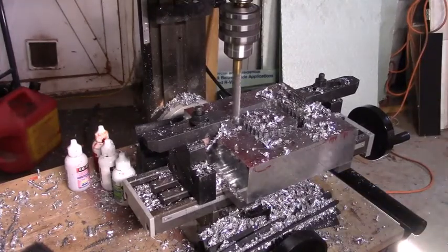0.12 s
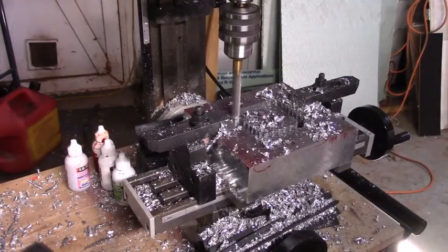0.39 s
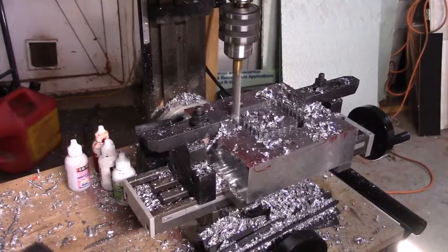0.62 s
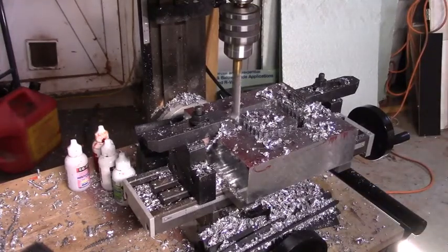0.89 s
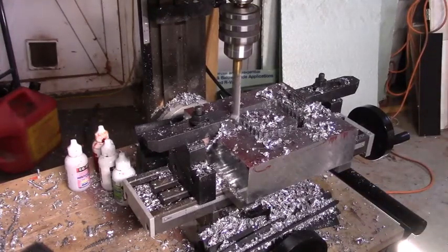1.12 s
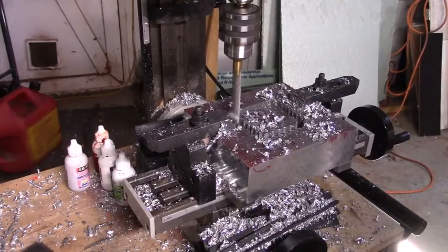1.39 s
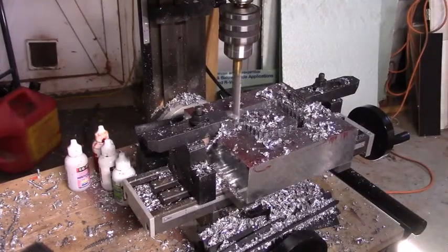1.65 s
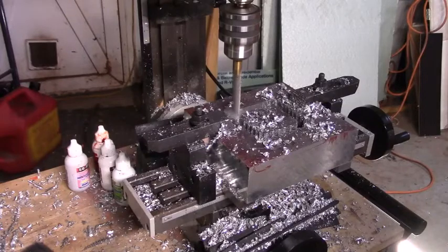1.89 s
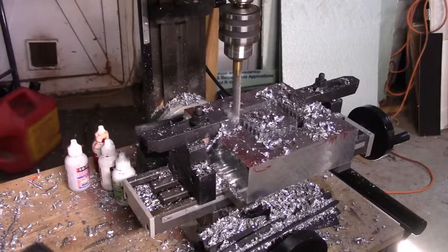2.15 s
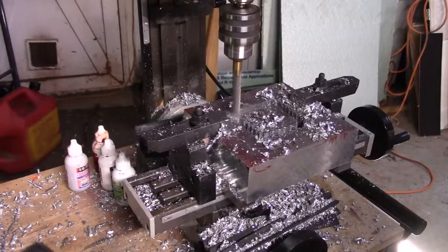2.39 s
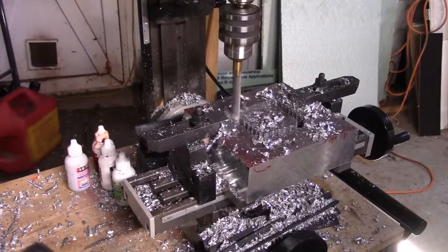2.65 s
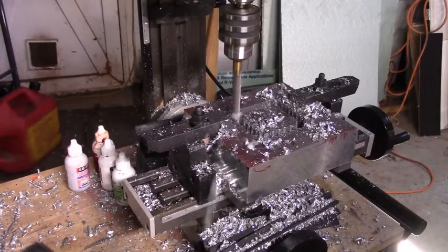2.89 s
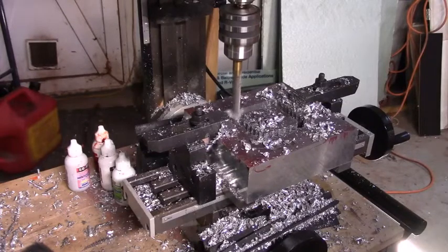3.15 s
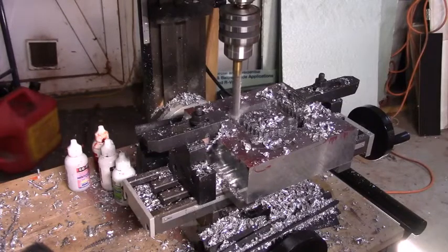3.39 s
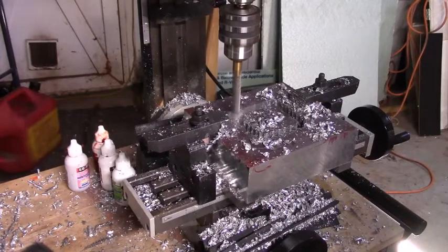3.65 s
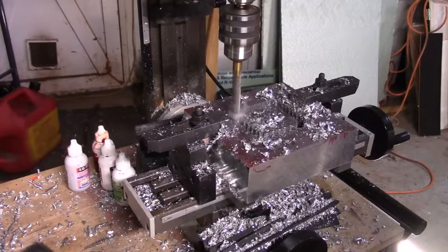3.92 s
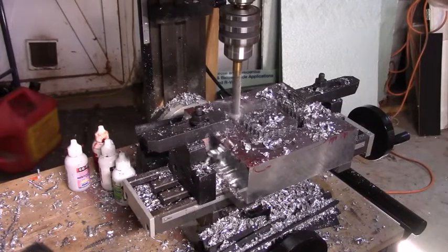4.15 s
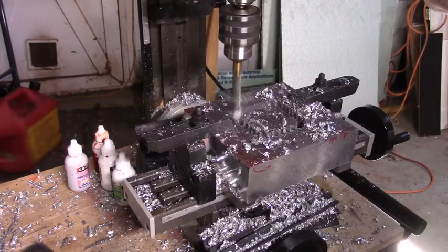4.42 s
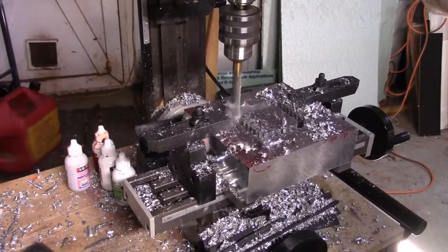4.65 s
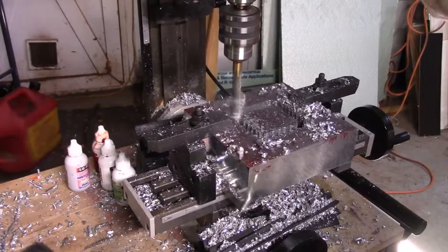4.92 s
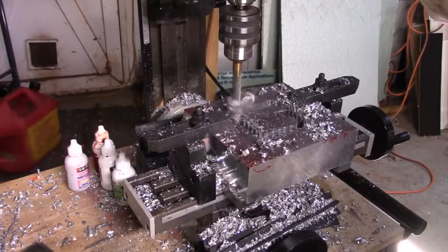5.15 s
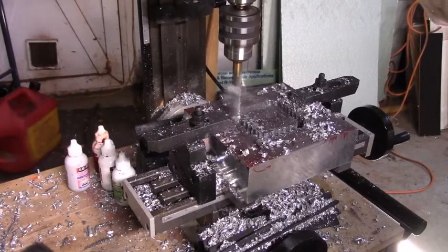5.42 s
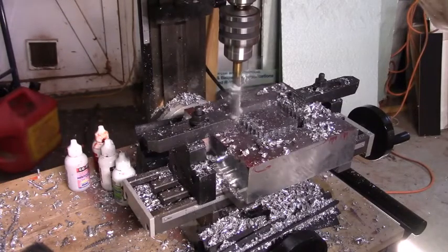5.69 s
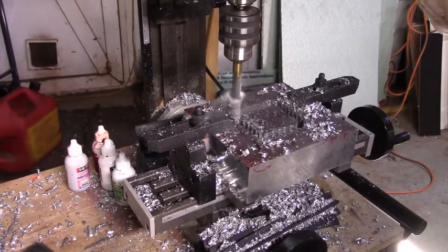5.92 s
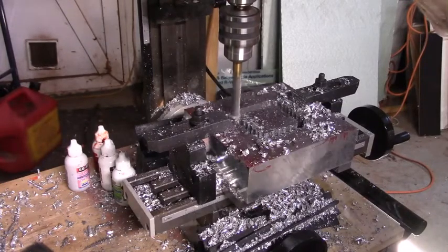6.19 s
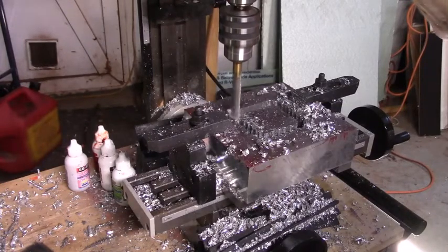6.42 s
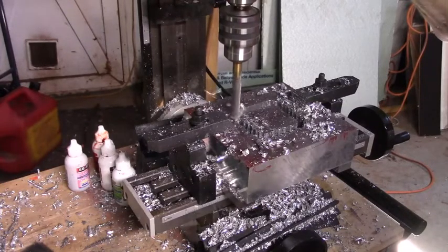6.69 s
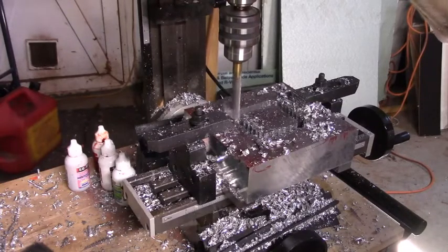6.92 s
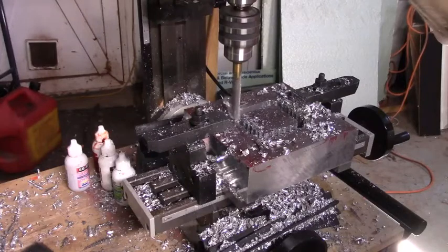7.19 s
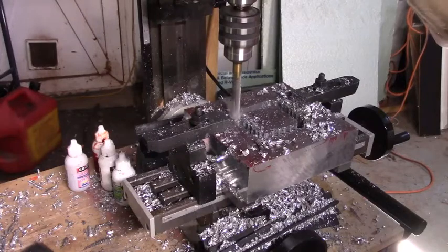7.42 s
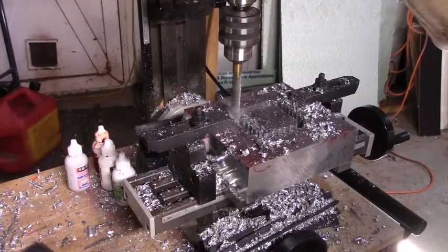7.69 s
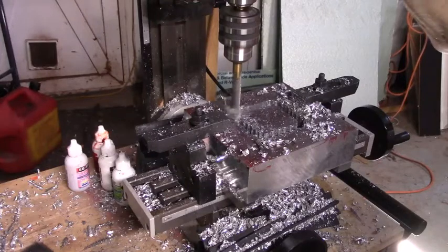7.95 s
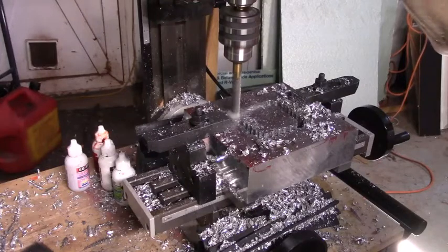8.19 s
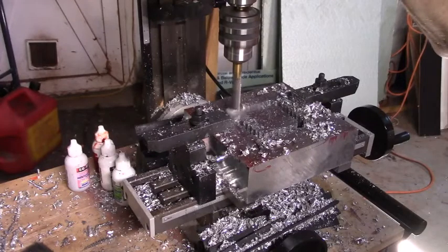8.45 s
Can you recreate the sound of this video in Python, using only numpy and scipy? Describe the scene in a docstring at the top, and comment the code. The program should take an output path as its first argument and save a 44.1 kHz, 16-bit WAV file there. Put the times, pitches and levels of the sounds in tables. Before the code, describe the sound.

A benchtop milling machine runs without pause, close by in a home workshop: motor hum, two steady gear whines and dense metallic rattling hiss. A low shuddering growl shakes the vice for nearly three seconds as the bit bites, while a very high squeal rises unevenly. Then the growl fades, and the squeal turns strong, rapidly fluttering and continuous to the end.

```python
"""Small geared mill drilling aluminium

Gear tones follow the speed of the shaft, shaped noise makes the teeth rattle, and short knocks ring in the cover.
The bit squeals as a gliding tone whose level and pitch repeat with each turn. The table growls with
filtered noise, and with a hum of the tip while it wobbles in a five-lobed hole, before the bit runs true.
Now and then the whole sound thins out briefly to a few narrow strands."""
import sys
import numpy as np
from scipy import signal
from scipy.fft import rfft, irfft
from scipy.io import wavfile
from scipy.ndimage import uniform_filter1d, map_coordinates

SR = 44100
rng = np.random.default_rng(int(sys.argv[2]) if len(sys.argv) > 2 else 0)


def ratio_of_db(decibels):
    """Turn decibels (scalar or array-like) into linear amplitude factors; 0 dB maps to 1."""
    return 10 ** (np.asarray(decibels, float) / 20)


def wav_out(sig):
    """Save sig, one row per channel (or a flat mono array), as 16-bit PCM at SR to the path in sys.argv[1]."""
    wavfile.write(sys.argv[1], SR, np.round(np.clip(np.atleast_2d(sig).T, -1, 1) * 32767).astype(np.int16))


N = 377937
TIME_S = np.arange(N) / SR
MOTOR_RATIO = 15 / 7  # motor turns per countershaft turn


def rms_one(x):
    """Scale to rms 1."""
    return x / np.sqrt(np.mean(x ** 2) + 1e-20)


def in_time(rows):
    """Draw each column of a table as a curve with a value at every sample."""
    s, *columns = np.transpose(rows)
    return [np.interp(TIME_S, s, column) for column in columns]


def drift(per_s):
    """Slow chance with spread 1: noise through a double one-pole low-pass, made at every 10th sample."""
    r = np.exp(-20 * np.pi * per_s / SR)
    noise = rng.standard_normal(N // 10 + 4002)
    slow = signal.lfilter([1], [1, -2 * r, r * r], noise)[4000:]  # leave out the start of the filter
    return np.interp(np.arange(N) / 10, np.arange(len(slow)), rms_one(slow))


def resonate(x, hz, width_hz):
    """A two-pole resonance with gain 1 on top."""
    r = np.exp(-np.pi * width_hz / SR)
    poles = [1, -2 * r * np.cos(2 * np.pi * hz / SR), r * r]
    return signal.lfilter([(1 - r * r) / 2, 0, (r * r - 1) / 2], poles, x)


def lobedness():
    """1 while the tip wobbles in the lobed hole, 0 once the bit runs true."""
    runs_true_s, settle_s = 2.785, 0.13  # middle and length of the change
    return np.clip(0.5 - (TIME_S - runs_true_s) / settle_s, 0, 1)


# The three main tones of the gears: 8 per motor turn (the hum), then the 4th and 7th multiple of a
# 15-tooth mesh (lower and upper whine). Each entry: multiple of the countershaft speed.
MAIN_ORDERS = [8 * 15 / 7, 60, 105]
# Fainter mesh tones and sidebands. Each row: multiple of the countershaft speed, level in dB against the gear head.
FAINT_TONES = [(12.0, -32.6), (24.0, -25.2), (25.0, -23.7), (26.52, -25.0), (29.0, -27.6), (30.0, -21.7),
               (35.0, -30.0), (36.0, -20.5), (40.0, -30.9), (41.0, -31.2), (42.0, -26.6), (42.52, -31.1),
               (44.0, -25.4), (45.0, -19.7), (47.0, -20.2), (48.0, -16.2), (50.0, -25.6), (58.0, -23.8),
               (59.0, -18.2), (60.43, -18.8), (62.14, -25.2), (63.19, -26.6), (64.29, -30.4), (70.0, -31.7),
               (75.0, -28.5), (78.0, -30.0), (81.0, -29.5), (86.86, -29.8), (88.0, -24.6), (90.0, -26.6),
               (92.19, -29.3), (100.0, -31.0), (100.76, -29.4), (103.0, -23.8), (106.0, -28.9),
               (108.19, -30.1), (110.0, -30.9), (115.0, -28.9), (117.0, -27.2), (118.0, -26.9),
               (119.0, -30.2), (120.0, -20.5), (122.0, -31.6), (150.0, -26.7), (165.0, -32.1)]
# The level of the lower whine wanders irregularly. Each row: time in seconds, level in dB.
LOWER_WHINE_LEVEL = [(0, -22), (.25, -20.5), (1.0, -23), (1.85, -21.5), (2.5, -23.5), (3.7, -19.5),
                     (4.1, -22.5), (4.6, -21), (5.05, -23.5), (5.9, -19.5), (6.15, -19), (6.45, -25.5),
                     (6.78, -19.5), (7.05, -21), (7.3, -21.5), (8.0, -19.5), (8.57, -21.5)]


def gear_tones(shaft_turns, head_db):
    """Every tone follows the shaft, its level and phase wander a little, and a bearing rings."""
    # the motor hum starts 6 dB weaker and rises within 0.55 s
    hum_db = head_db - 18.5 - 6 * np.clip(1 - TIME_S / 0.55, 0, 1)
    # the upper whine sags once as the tip first bites
    sag_at_s, sag_length_s, sag_depth_db = 1.05, 0.2, -11
    sag_db = sag_depth_db * np.exp(-(2 * (TIME_S - sag_at_s) / sag_length_s) ** 2)
    upper_db = head_db - 10.6 + sag_db
    lower_db, = in_time(LOWER_WHINE_LEVEL)

    tones = list(zip(MAIN_ORDERS, [hum_db, lower_db, upper_db]))
    tones += [(order, db + head_db) for order, db in FAINT_TONES]
    wander = [drift(per_s=8.8) for _ in range(8)]  # shared out among the tones
    out = np.zeros(N)
    for k, (order, db) in enumerate(tones):
        phase = 2 * np.pi * (order * shaft_turns + rng.random())
        phase += 0.36 * wander[(k + 3) % len(wander)]
        wandering_db = db + 0.8 * wander[k % len(wander)]
        out += np.sqrt(2) * ratio_of_db(wandering_db) * np.sin(phase)

    # the bearing rings at first, fades by 4.5 dB per second to a resting level, and wavers
    ring_db = np.maximum(-28 - 4.5 * TIME_S, -43) + 1.8 * drift(per_s=7.5)
    ring = resonate(rng.standard_normal(N), hz=5740, width_hz=41)
    ring = resonate(ring, hz=5630, width_hz=110)
    return out + ratio_of_db(ring_db) * rms_one(ring)


# Tone colour of the rattling gear train. Each row: frequency in Hz, relative strength in dB per Hz.
RATTLE_COLOUR = [(40, -66), (70, -40.5), (120, -23.5), (250, -14.5), (600, -14.5), (1280, -9.5), (1600, -1),
                 (2550, -11.5), (3500, -1), (4500, -1), (5200, -9), (6600, -13.5), (9900, -20),
                 (14000, -35)]
# Resonances of the head casting. Each row: centre in Hz, width in Hz, lift in dB (below zero is a cut).
CASTING = [(978, 330, 8.5), (1829, 31, 11.5), (1946, 50, -8.5), (2060, 100, 5.5), (2318, 367, 11),
           (2700, 20, 8.5), (3830, 130, 2), (5200, 200, -2), (6300, 33, 4.5), (7290, 800, 7.5),
           (8450, 300, 2), (8850, 110, 11)]


def rattle(shaft_turns):
    """Loose teeth knock densely; the upper range throbs with the turns of motor and countershaft."""
    motor_angle = 2 * np.pi * MOTOR_RATIO * shaft_turns
    beat_db = 2.8 * np.cos(motor_angle) + 1.2 * np.cos(2 * motor_angle)
    beat_db += 1.3 * np.cos(4 * np.pi * shaft_turns)  # twice per countershaft turn
    beat_db += 1.2 * drift(per_s=140)
    smooth, knocks = rng.standard_normal((2, N))
    knocks = rms_one(knocks * ratio_of_db(beat_db))

    hz = np.arange(N // 2 + 1) * SR / N + 1
    colour_hz, colour_db = np.transpose(RATTLE_COLOUR)
    db = np.interp(np.log(hz), np.log(colour_hz), colour_db)
    for centre_hz, width_hz, lift_db in CASTING:
        db += lift_db / (1 + (2 * (hz - centre_hz) / width_hz) ** 2)

    # steady noise below about 2700 Hz, throbbing noise above
    upper = 1 / (1 + (2700 / hz) ** 8)
    mixed = np.sqrt(1 - upper) * rfft(smooth) + np.sqrt(upper) * rfft(knocks)
    return rms_one(irfft(mixed * ratio_of_db(db), N))


def casting_ticks(per_s, t60_s):
    """Single harder tooth knocks ring briefly in the many small modes of the head cover."""
    happens = rng.random(N) < per_s / SR
    sizes = ratio_of_db(4.6 * np.minimum(rng.exponential(1, N), 4)) * happens
    modes_hz = np.geomspace(2900, 4900, 20)
    dealt = rng.integers(0, 20, N)  # each knock goes to one mode
    width_hz = np.log(1000) / np.pi / t60_s
    # the tiny constant keeps the filter away from vanishingly small numbers
    return rms_one(sum(resonate(sizes * (dealt == k) + 1e-18, hz, width_hz) for k, hz in enumerate(modes_hz)))


# Squeal over one turn in the round hole, as the two edges grip and let go; squeal() stretches both swings.
# Each row: angle in turns, level in dB before stretching, pitch shift in Hz before stretching.
ROUND_HOLE = [(0.025, -5, -315), (0.075, -1.5, -75), (0.125, -1.5, 75), (0.175, -2.5, 150),
              (0.275, -2, 110), (0.372, -.6, 195), (0.425, 2.7, 125), (0.525, 2.5, -90), (0.575, 2.5, -100),
              (0.625, -12, -25), (0.675, -3.5, 95), (0.723, -0.3, 130), (0.835, -3, 75), (0.875, -5, 35),
              (0.925, -3.3, -95), (0.975, 2.6, -290)]
# As the hole deepens the pitch swing widens and the stronger grip moves from the middle of the turn to its start.
# Each row: time in seconds, share of the pitch swing (no unit), lead of one edge in dB before stretching.
DEEPENING = [(3.0, 0.65, 1), (5.0, 0.92, -1), (6.5, 1.4, -0.5)]


def over_turn(turns):
    """Level and pitch pattern along each turn: grip fails once per lobe at first, by the two edges later."""
    # five lobes; the pitch jumps up as the grip takes hold again
    lobe = 2 * np.pi * 5 * (turns - 0.025)
    slip = ((1 + np.cos(lobe)) / 2) ** 2
    lobed_db = 5 * (0.25 - slip) + 0.4 * np.cos(2 * np.pi * (turns - 0.53))
    lobed_hz = 60 * np.sin(lobe + 0.15)

    angle, db, hz = np.transpose(ROUND_HOLE)
    swing, lead_db = in_time(DEEPENING)
    round_db = np.interp(turns % 1, angle, db, period=1) - lead_db * np.cos(2 * np.pi * turns)
    round_hz = np.interp(turns % 1, angle, hz, period=1) * swing

    lobed = lobedness()
    return lobed * lobed_db + (1 - lobed) * round_db, lobed * lobed_hz + (1 - lobed) * round_hz


def scored_wall(turns, memory):
    """Roughness of the hole wall: each turn keeps a share of the marks of the turn before; spread 1."""
    fresh = rng.standard_normal((140, 24))  # turns, marks along each turn
    marks = signal.lfilter([1], [1, -np.clip(memory, 0, 0.95)], fresh, axis=0)
    return map_coordinates(rms_one(marks.ravel()), [turns * 24], order=3, mode="nearest")


# Course of the squeal of the bit, before the turn pattern and the resonances act on it.
# Each row: time in seconds, pitch in Hz, level in dB.
SQUEAL_COURSE = [(0.0, 12220, -39), (0.26, 12230, -42), (0.45, 12230, -47), (0.5, 12300, -35),
                 (0.9, 12370, -26.5), (1.53, 12570, -22.5), (1.75, 12440, -26.5), (2.04, 12540, -20.5),
                 (2.21, 12300, -30), (2.55, 12500, -23), (2.72, 12200, -26), (3.06, 12380, -17),
                 (3.45, 12340, -19.3), (3.85, 12510, -17.5), (4.76, 12490, -17), (5.2, 12530, -17.5),
                 (5.95, 12560, -18), (6.46, 12270, -19.5), (7.14, 12180, -20.5), (7.6, 12270, -19.5),
                 (7.99, 12350, -19), (8.3, 12460, -19), (8.57, 12270, -16)]


def squeal(turns):
    """The bit sings on its own twisting mode, gripping and letting go along the wall."""
    pitch_hz, level_db = in_time(SQUEAL_COURSE)
    lobed = lobedness()
    turn_db, turn_hz = over_turn(turns)

    grip_db = (1.8 + 0.5 * lobed) * turn_db
    grip_db += 3.1 * scored_wall(turns, memory=0.89)
    grip_db += (3.5 + 3.6 * lobed) * drift(per_s=230)
    grip = rms_one(np.tanh(ratio_of_db(grip_db) / 4))  # a self-excited swing cannot grow without bound

    hz = pitch_hz + 1.2 * turn_hz
    hz += (45 + 60 * lobed) * scored_wall(turns, memory=0.8)
    hz += 50 * drift(per_s=197)
    tone = np.sqrt(2) * np.sin(2 * np.pi * np.cumsum(hz) / SR)

    rub = resonate(rng.standard_normal(N), hz=12120, width_hz=760)
    rub = rms_one(resonate(rub, hz=12580, width_hz=1150))
    swing = grip * (tone + ratio_of_db(-15) * rub)
    swing -= 0.6 * resonate(swing, hz=11970, width_hz=150)  # quiet gap between two close modes
    swing += 0.7 * resonate(swing, hz=11790, width_hz=130)  # the lower mode
    swing = resonate(swing, hz=11700, width_hz=4500)  # the shank radiates best near its modes

    # at the hardest grip the edge slips with a short scrape, most of all in the lobed hole
    scrape = rms_one(resonate(rng.standard_normal(N), hz=10900, width_hz=550))
    scrape = ratio_of_db(-27.5 + 1.3 * lobed) * grip ** 2 * scrape
    return ratio_of_db(level_db - 0.5) * (swing + scrape + ratio_of_db(-21.5) * rub)


# Shaking of the vice. Each row: time in seconds, level in dB.
SHAKE = [(0.0, -30.5), (0.3, -25), (0.5, -30), (0.7, -25), (1.0, -25), (1.12, -27.5), (1.33, -24),
         (1.7, -32.5), (2.0, -26), (2.25, -32.5), (2.6, -31), (3.0, -36), (4.0, -35), (6.0, -35.5),
         (7.0, -33.5), (8.57, -33.5)]
# Resonances of the vice, each passed twice. Each row: centre in Hz, width of one pass in Hz, gain in dB
# against the others.
VICE_MODES = [(267.6, 82, 0.5), (393, 163, 2), (589.4, 240, 5)]
# Wobble of the tip in the lobed hole. Each row: multiple of the pattern turn, level in dB against the vice.
WOBBLE = [(5, -25.5), (6, -43), (8, -23.5), (9, -29.5), (10, -40), (12, -30), (13, -20.5), (14, -36),
          (15, -17), (16, -18.5), (17, -51), (18, -33), (20, -12.5), (22, -19), (24, -17), (26, -11.5),
          (27, -18.5), (28, -19), (29, -15.5), (31, -14), (32, -26), (34, -14.5), (38, -16.5)]
# Swells of the bench below. Each row: middle in seconds, length in seconds, lift in dB.
BENCH_SWELLS = [(0.15, 0.49, 15), (0.65, 0.37, 7), (1.4, .3, 4.4), (1.85, 0.34, 9.3), (2.45, .55, 10)]


def table_growl(turns):
    """The wobbling tip hums at multiples of its turn; rumble shakes vice and bench."""
    vice_db, = in_time(SHAKE)
    bench_db = np.full(N, -48.5)  # at rest
    for at_s, length_s, lift_db in BENCH_SWELLS:
        bench_db += lift_db * np.exp(-(2 * (TIME_S - at_s) / length_s) ** 4)

    hum = np.zeros(N)
    for order, db in WOBBLE:
        phase = 2 * np.pi * (round(order) * turns + rng.random())
        hum += ratio_of_db(db + 2.4 * drift(per_s=5.1)) * np.sin(phase)
    hum *= np.sqrt(2) * lobedness()

    rumble = rng.standard_normal((2, N)) * ratio_of_db(drift(per_s=8.0))
    vice = np.zeros(N)
    for hz, width_hz, db in VICE_MODES:
        vice += ratio_of_db(db) * resonate(resonate(rumble[0], hz, width_hz), hz, width_hz)
    bench = resonate(resonate(rumble[1], hz=138, width_hz=144), hz=139, width_hz=170)
    return ratio_of_db(vice_db) * (rms_one(vice) + hum) + ratio_of_db(bench_db) * rms_one(bench)


# Speed of the countershaft under the changing feed. Each row: time in seconds, speed in turns per second.
SHAFT_SPEED = [(0.0, 37.95), (0.25, 37.95), (0.62, 38.105), (0.79, 37.99), (0.95, 38.1), (1.27, 37.97),
               (1.5, 38.045), (1.82, 37.985), (2.14, 38.04), (2.9, 38.055), (3.57, 37.95), (4.1, 38.045),
               (4.57, 38.0), (4.97, 38.07), (5.6, 38.0), (6.0, 38.02), (6.13, 38.165), (6.5, 38.06),
               (7.05, 38.085), (7.7, 38.005), (8.57, 38.045)]
# Loudness of the gear head. Each row: time in seconds, level in dB.
HEAD_LEVEL = [(0.0, -13.0), (2.5, -13), (3.9, -14.0), (5.0, -14.5), (6.0, -14.7), (6.9, -14.5),
              (8.57, -14.5)]
# Turns made by the contact pattern, which lags the spindle while the hole is lobed.
# Each row: time in seconds, turns made so far.
PATTERN_TURNS = [(0, .926), (2.78, 43.766), (8.57, 134.918)]


def scene():
    """Add up gear head, bit and table, all driven by the turning of shaft and contact pattern."""
    speed, = in_time(SHAFT_SPEED)
    speed = speed + 0.012 * drift(per_s=4.0)  # the speed also hunts at random, in turns per second
    shaft_turns = np.cumsum(speed) / SR
    turns, = in_time(PATTERN_TURNS)
    head_db, = in_time(HEAD_LEVEL)

    mix = gear_tones(shaft_turns, head_db)
    mix += ratio_of_db(head_db - 3.5) * rattle(shaft_turns)
    mix += ratio_of_db(head_db - 13.5) * casting_ticks(per_s=900, t60_s=0.065)
    mix += squeal(turns)
    mix += table_growl(turns)
    return mix[None]


# Moments when the whole sound thins out briefly to a few narrow strands.
# Each row: middle in seconds, length in seconds.
DIPS = [(.414, .015), (.477, .016), (1.161, .013), (1.267, .016), (1.863, .014), (2.547, .016),
        (2.632, .014), (3.037, .018), (3.442, .017), (3.646, .029), (4.04, .014), (4.104, .015),
        (4.147, .013), (4.254, .014), (4.328, .031), (4.551, .018), (4.829, .016), (4.915, .013),
        (5.042, .015), (5.213, .017), (5.256, .015), (5.449, .012), (5.769, .018), (6.046, .014),
        (6.131, .016), (6.259, .014), (6.409, .014), (6.557, .017), (6.624, .014), (6.835, .013),
        (6.908, .029), (7.112, .013), (7.176, .015), (7.523, .012), (7.644, .014), (7.909, .029),
        (8.286, .016), (8.479, .012), (8.542, .012)]


def thin_out(x, stand_db, spare_db):
    """In each dip, weaken the spectrum except strong strands that stand out, or lie in the squeal's range."""
    size = 4096
    half = size // 2
    out = np.pad(x, half)
    s = (np.arange(size) - half) / SR
    squealing = np.arange(half + 1) * SR / size > 11700
    for at_s, length_s in DIPS:
        start = round(at_s * SR)
        piece = slice(start, start + size)
        strength = np.abs(rfft(out[piece] * np.exp(-0.5 * (s / 0.011) ** 2)))
        neighbours = uniform_filter1d(strength, size=45)
        buried = (strength < ratio_of_db(stand_db) * neighbours) & ~squealing
        weak = buried | (strength < ratio_of_db(spare_db) * strength.max())
        window = np.clip((length_s / 2 - np.abs(s)) / 0.012 + 0.5, 0, 1)
        taken = 1 - ratio_of_db(-1.4 * length_s * 1000)  # 1.4 dB per ms: the longer the dip, the deeper
        out[piece] -= window * taken * irfft(rfft(out[piece]) * weak, size)
    return out[half:half + N]


def band_limit(x):
    """A steep low-pass at the top of the band."""
    return signal.sosfilt(signal.butter(12, 15720, fs=SR, output="sos"), x)


def record(dry):
    """Peaks are rounded, the deep bass is cut, and the sound thins out now and then."""
    rounded = 1.236 * np.tanh(dry / 1.034)
    bass_cut = signal.butter(2, 75, "high", fs=SR, output="sos")
    cut = signal.sosfilt(bass_cut, rounded)
    mix = thin_out(cut[0], stand_db=6, spare_db=-18)[None]
    return band_limit(mix)


dry = scene()
out = record(dry)
wav_out(out)
```